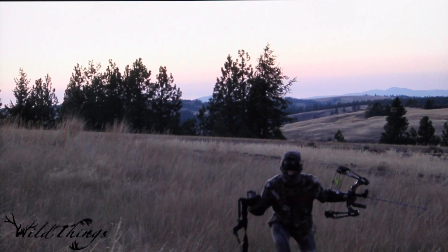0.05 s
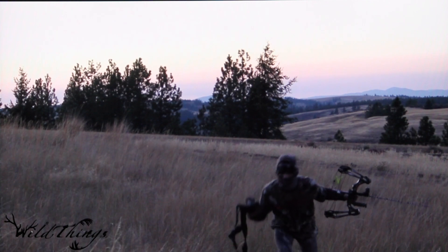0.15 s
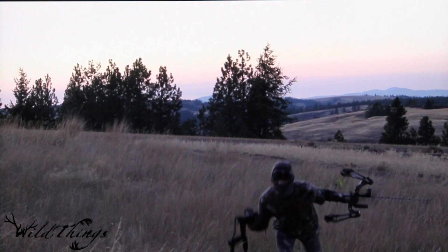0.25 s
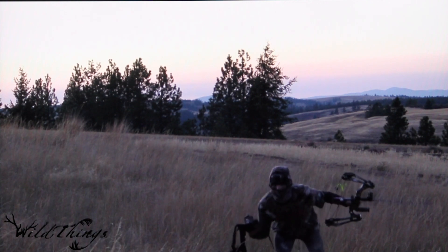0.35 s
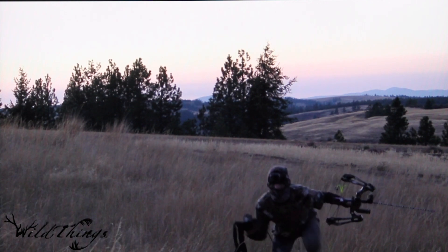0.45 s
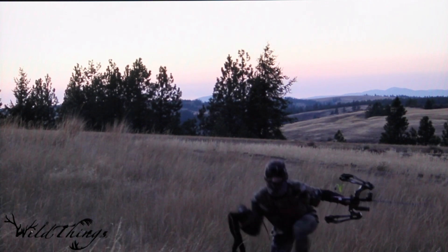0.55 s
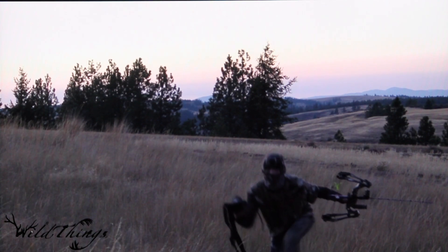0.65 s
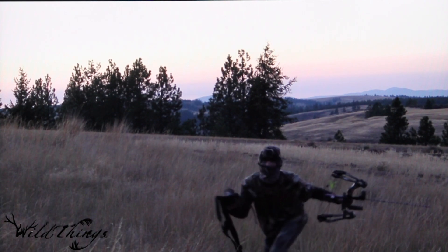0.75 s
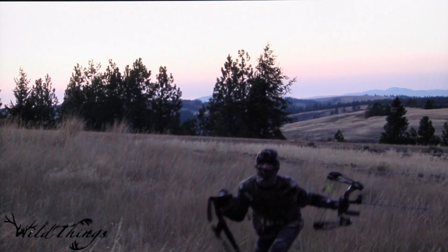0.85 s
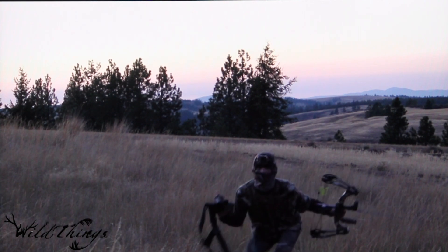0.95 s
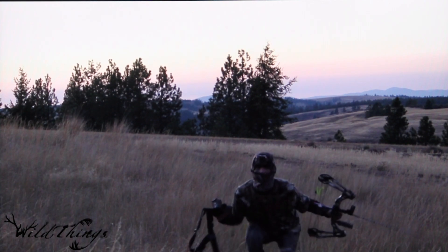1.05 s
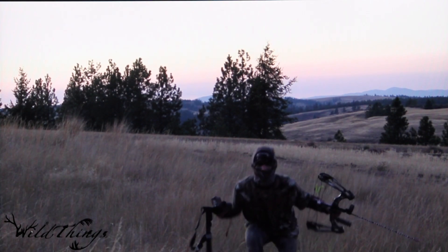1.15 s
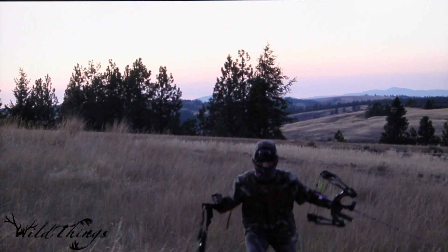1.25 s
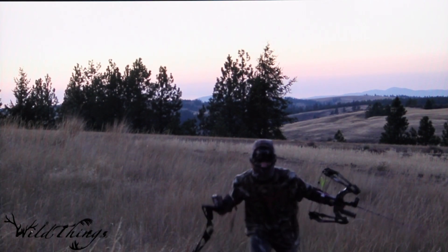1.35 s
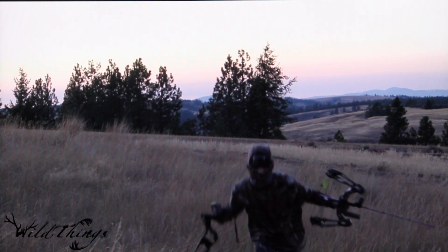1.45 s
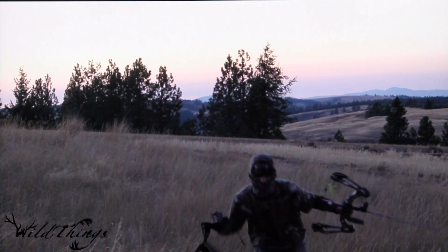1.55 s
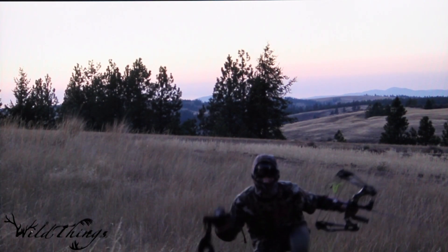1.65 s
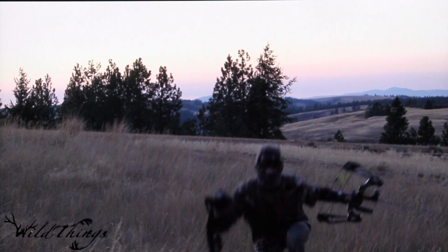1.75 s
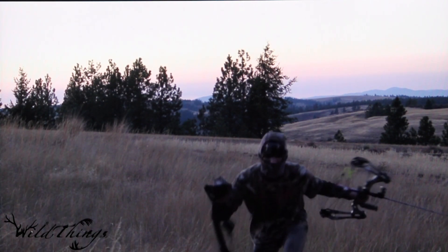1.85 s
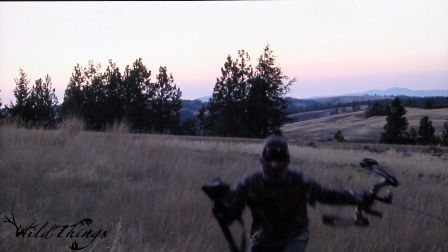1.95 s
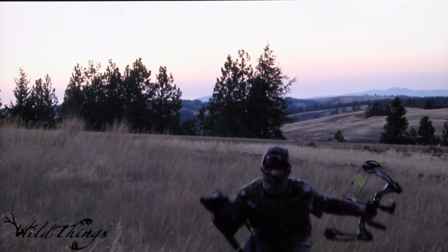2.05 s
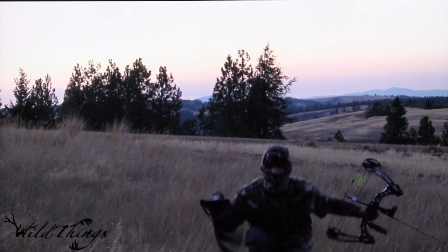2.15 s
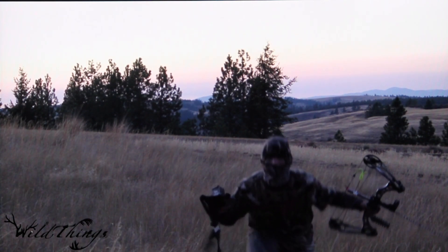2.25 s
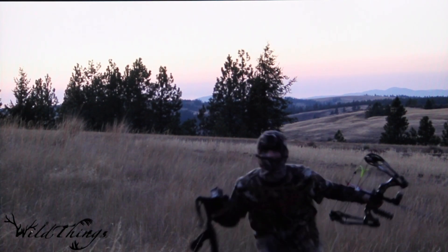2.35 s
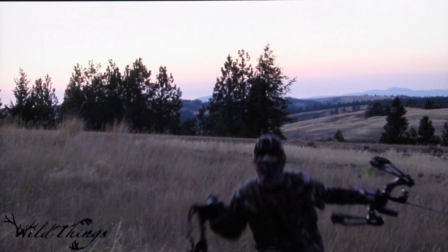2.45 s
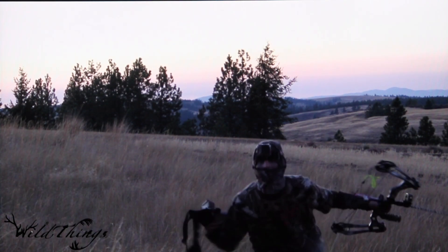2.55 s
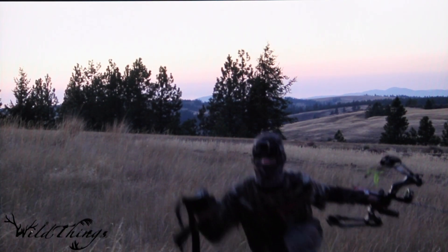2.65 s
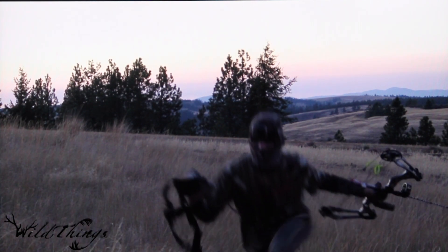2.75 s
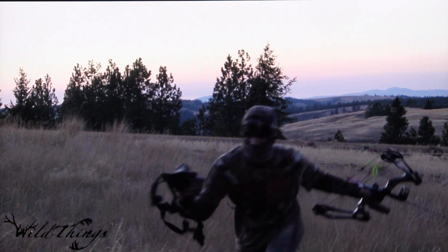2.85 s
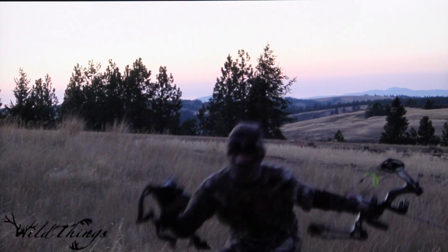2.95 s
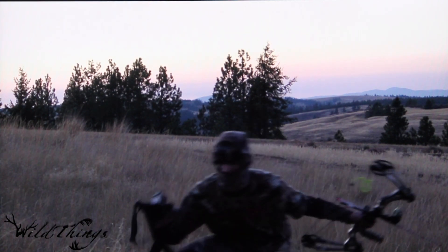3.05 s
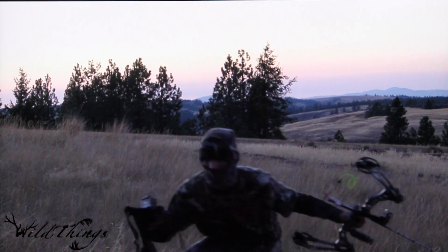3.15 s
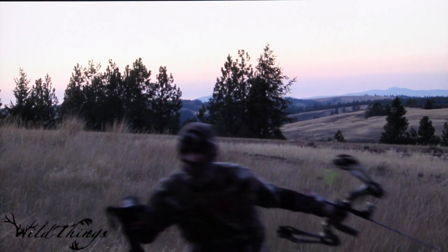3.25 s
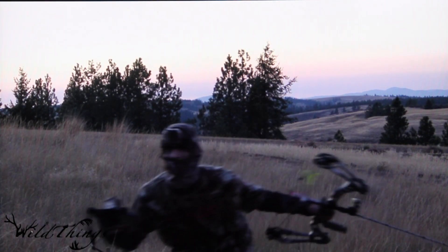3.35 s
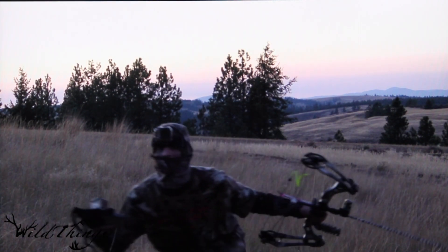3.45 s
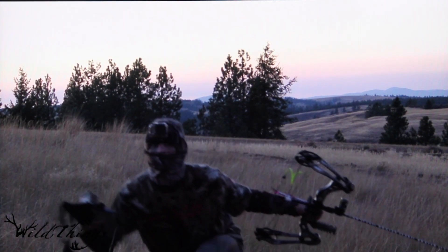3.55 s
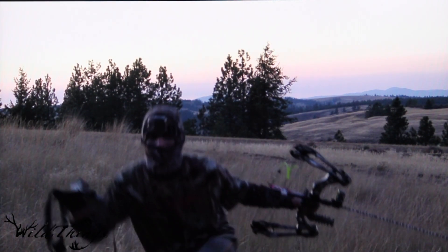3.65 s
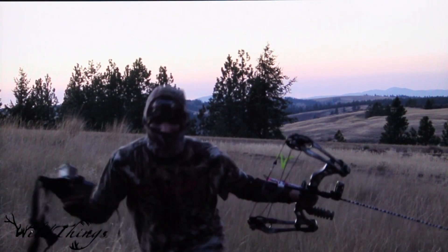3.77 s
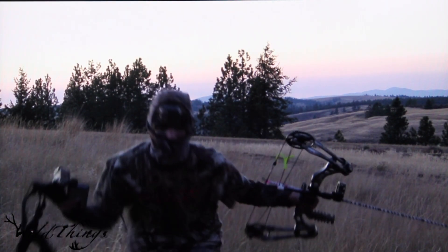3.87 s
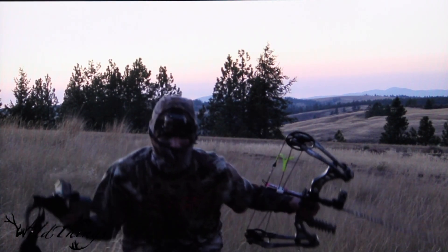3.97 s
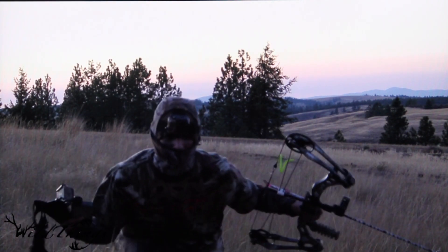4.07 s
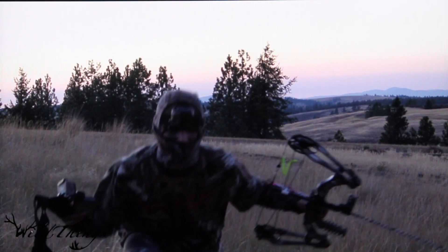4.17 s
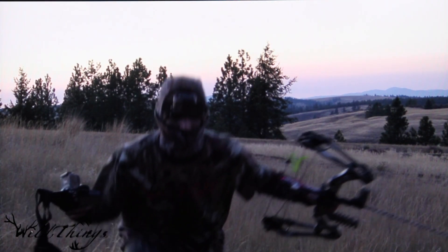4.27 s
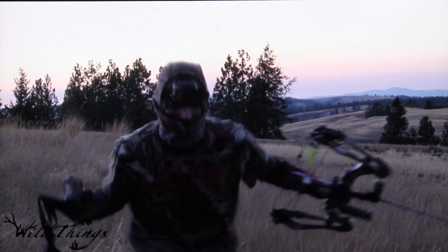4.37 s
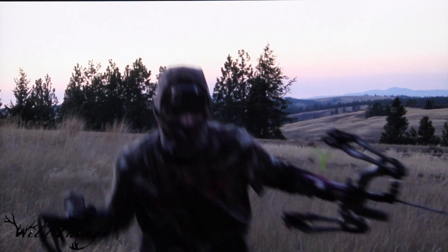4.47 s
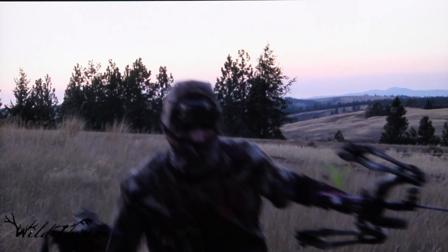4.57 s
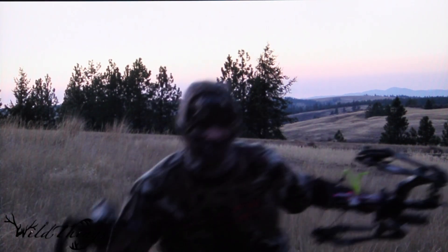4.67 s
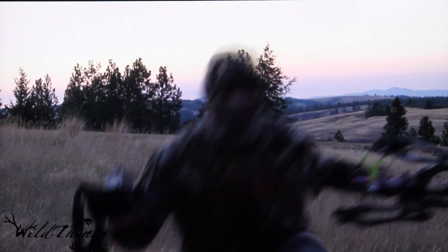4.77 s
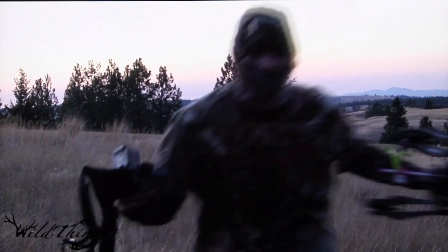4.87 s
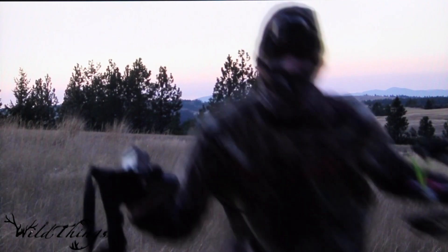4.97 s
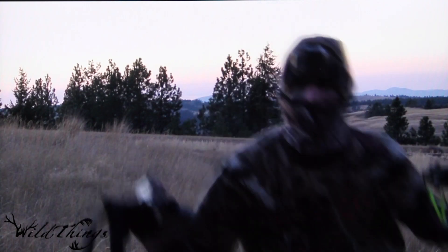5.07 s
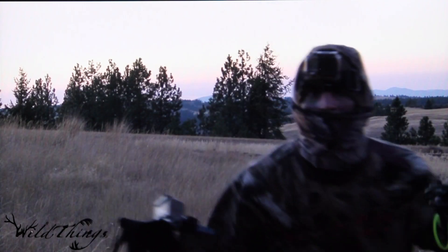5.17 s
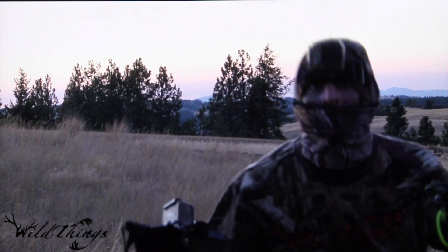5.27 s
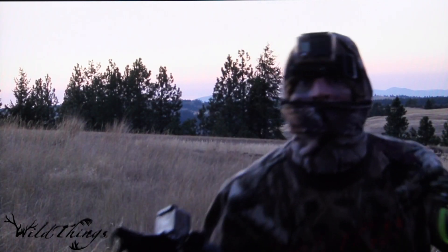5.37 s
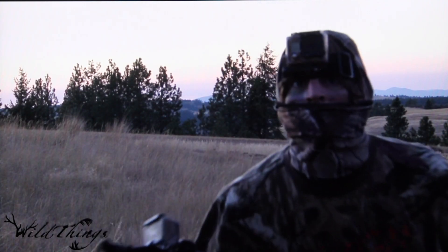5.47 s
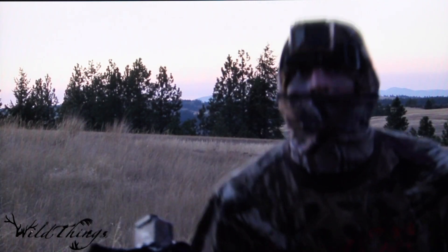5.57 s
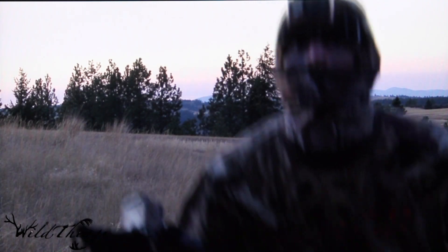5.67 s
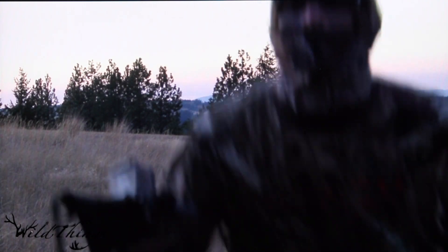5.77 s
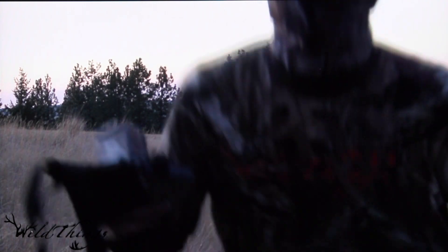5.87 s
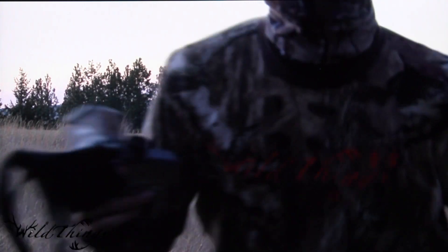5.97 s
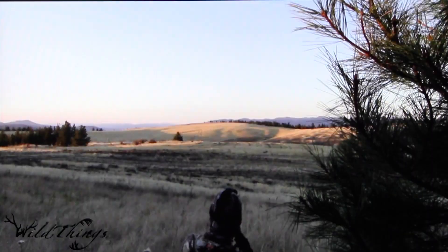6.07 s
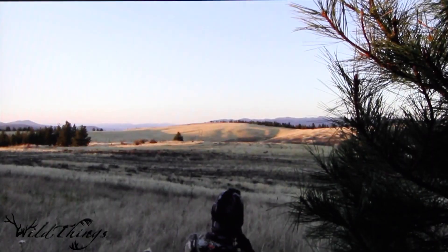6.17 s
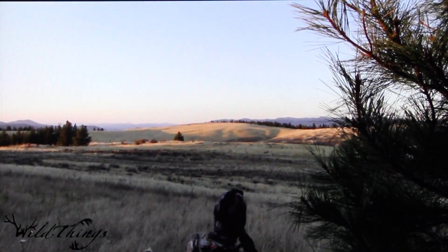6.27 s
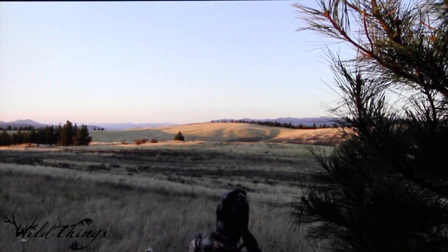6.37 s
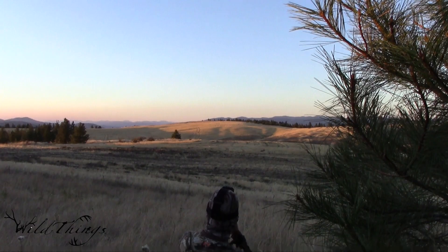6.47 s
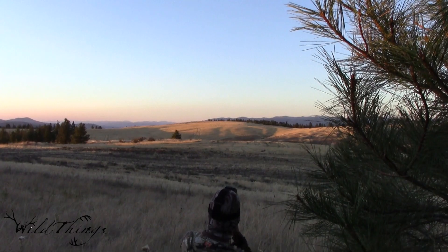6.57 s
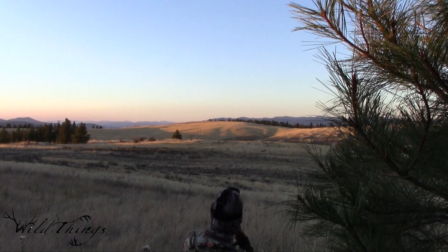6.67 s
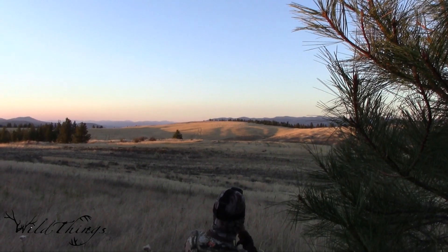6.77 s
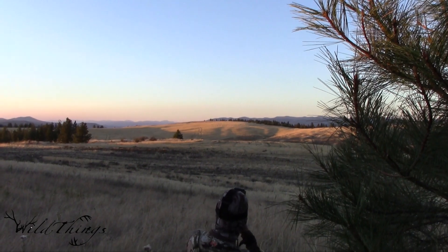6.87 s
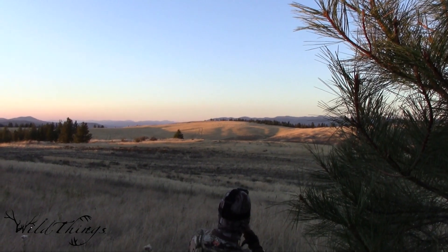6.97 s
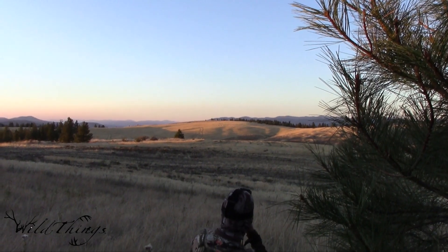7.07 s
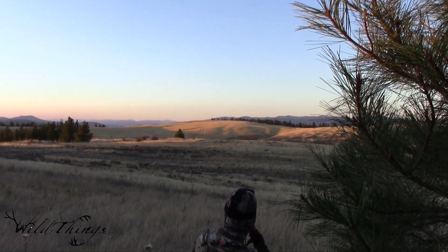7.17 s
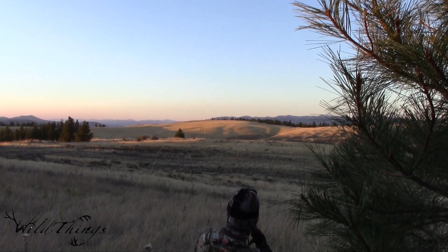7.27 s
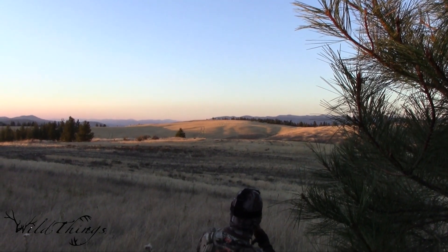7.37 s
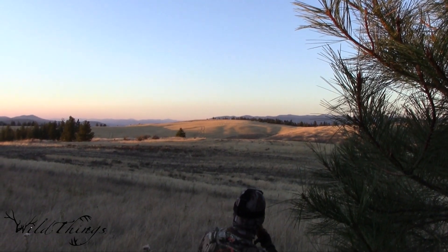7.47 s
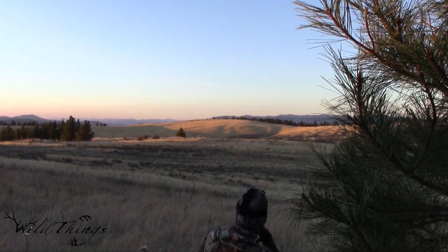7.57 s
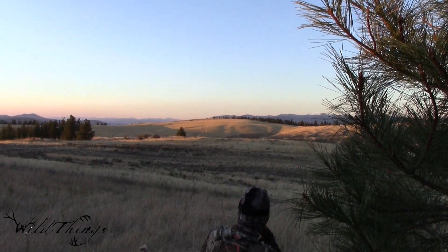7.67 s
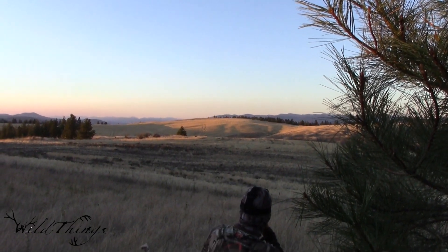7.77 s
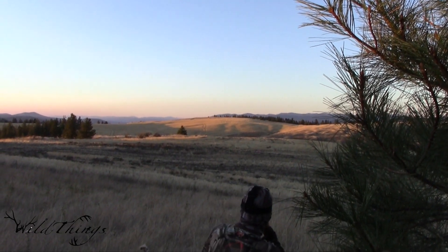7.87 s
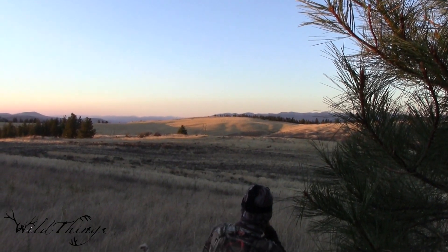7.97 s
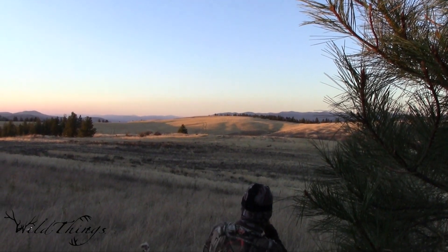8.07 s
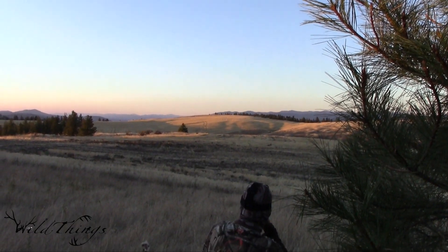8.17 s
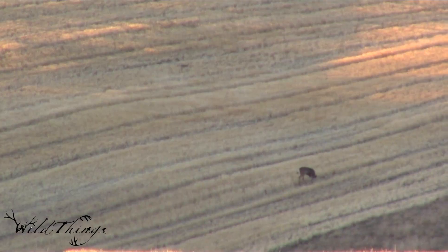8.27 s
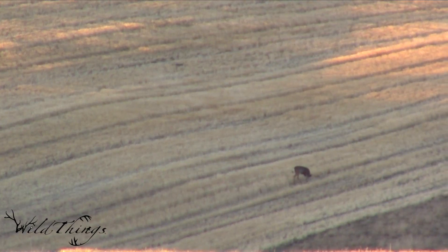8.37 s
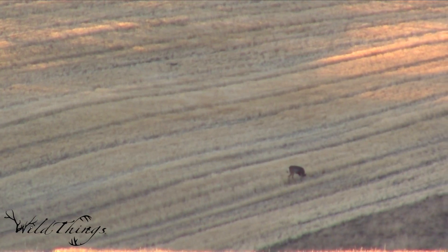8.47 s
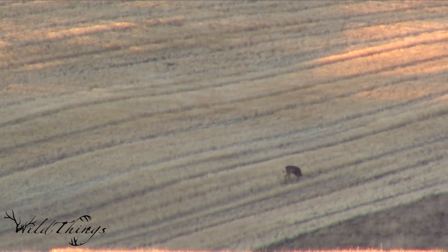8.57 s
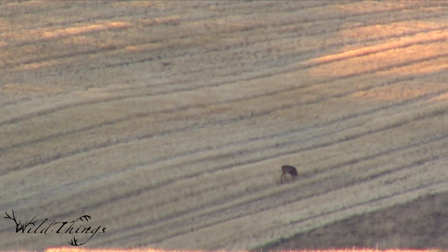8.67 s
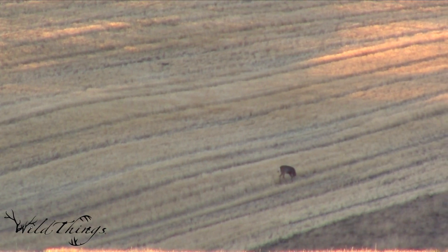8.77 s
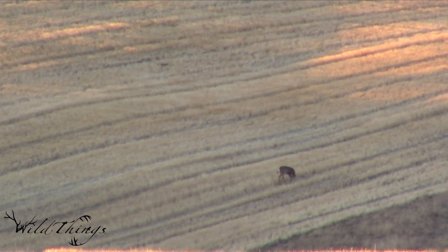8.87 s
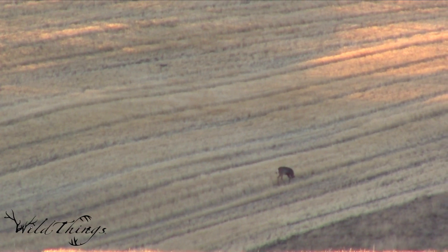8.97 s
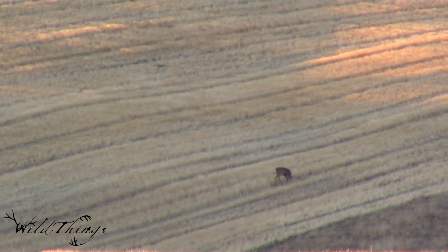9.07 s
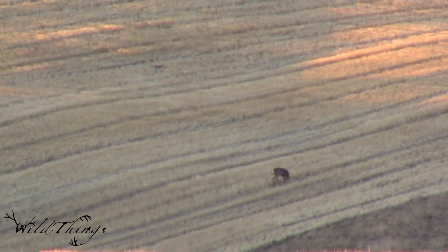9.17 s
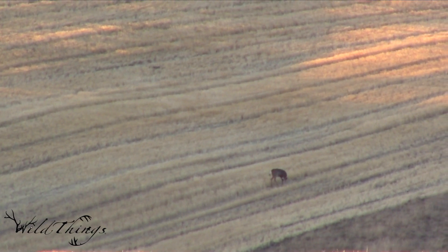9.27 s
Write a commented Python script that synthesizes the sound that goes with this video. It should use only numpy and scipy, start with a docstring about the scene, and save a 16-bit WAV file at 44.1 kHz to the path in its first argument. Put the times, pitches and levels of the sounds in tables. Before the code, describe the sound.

Dry, bright grass swishes, a few per second at first, then in longer sweeps, approach a nearly central microphone in the open, without reverberation. Muted footfalls and trouser rub lie underneath; brittle stalks snap and carried equipment ticks. Close by, several loud cracks and a resonant knock are heard. Suddenly the place becomes hushed, with soft air and a barely audible motor rasp, as a seated person shifts, jacket rustling close on both sides, and a soft bump comes late.

```python
"""A hunter wades through tall dry grass, at first farther off and then up to a camera on a field.
Random clicks and noise, filtered and enveloped, make swishing stalks, rubbing cloth and pressed litter;
decaying noise makes snapping stalks and knocking gear, and the camera case adds its resonances.
Then, abruptly, a quiet hillside: filtered noise for still air, a faint motor and a rustling jacket,
as someone sitting in the grass shifts a little; a few snaps and a soft bump still come."""
import sys
import numpy as np
from scipy import signal
from scipy.fft import rfft, irfft
from scipy.io import wavfile
from scipy.ndimage import uniform_filter1d

SR = 44100
rng = np.random.default_rng(int(sys.argv[2]) if len(sys.argv) > 2 else 0)


def generate_wav(sig):
    """Save sig (samples, or channels by samples) to the path in sys.argv[1] as 16-bit PCM at SR."""
    pcm = np.round(np.clip(np.atleast_2d(sig).T, -1, 1) * 32767).astype(np.int16)
    wavfile.write(sys.argv[1], SR, pcm)


N = 411276
TIME = np.arange(N) / SR
FREQS = np.fft.rfftfreq(8192, 1 / SR)
HILLSIDE_START_S = 6.516

# relative spectrum of sliding and breaking stalks: (frequency [Hz], density [dB per Hz])
GRASS_SPECTRUM = [(60, -66.5), (300, -52), (1000, -28.5), (2500, -15), (4000, -13.5), (5100, -11.5),
                  (5800, 2.5), (7000, -2.5), (8000, -3.5), (9400, -9), (10400, -2.5), (12300, -5),
                  (14800, -7.5), (15500, -28)]
# relative spectra of the air on the field and on the hillside: (frequency [Hz], density [dB per Hz])
FIELD_SPECTRUM = [(25, -21), (70, -2.5), (120, -8.5), (180, 0), (300, -2.5), (500, -8), (1000, -9),
                  (3000, -7.5), (14000, -25)]
HILL_SPECTRUM = [(25, -14.5), (70, -14), (130, -15.5), (270, -11.5), (380, -6.5), (600, -7.5), (770, -6.5),
                 (1250, -9), (1750, -7), (2100, -10), (6000, -17.5), (15000, -30)]


def undb(db):
    """Amplitude gain as the antilogarithm of a level in decibels."""
    return 10 ** (np.asarray(db) / 20)


def unit(x):
    """Normalisation to an rms of 1."""
    return x / np.sqrt(np.mean(x ** 2))


def loudest(x, span_s):
    """Normalisation of a short sound by the greatest short-time rms within it."""
    power = uniform_filter1d(x ** 2, int(span_s * SR), mode="constant")
    return x / np.sqrt(power.max())


def walk(rate):
    """Low-pass noise: random steps, rate per second, smoothed by a moving average to rms near 1."""
    k = int(SR / rate)
    steps = np.repeat(rng.standard_normal(N // k + 1), k)
    return unit(uniform_filter1d(steps, k))[:N]


def colour(x, points, ring_db=0):
    """Minimum-phase filter: folding the cepstrum makes a causal response from a magnitude alone."""
    hz, db = np.transpose(points)
    broad_db = np.interp(np.log(FREQS + 1), np.log(hz), db)
    cepstrum = irfft(np.log(undb(broad_db + ring_db)))
    half = len(FREQS) - 1
    cepstrum[1:half] *= 2
    cepstrum[half + 1:] = 0
    response = irfft(np.exp(rfft(cepstrum)))[:half]
    return signal.fftconvolve(x, response)[:len(x)]


def bump(hz, width):
    """Lorentzian resonance curve, 1 at its centre and one half at the edges of its width."""
    return 1 / (1 + (2 * (FREQS - hz) / width) ** 2)


def resonate(x, hz, width_hz):
    """Band-pass selection around one resonance."""
    edges = [hz - width_hz / 2, hz + width_hz / 2]
    return signal.sosfilt(signal.butter(2, edges, "band", fs=SR, output="sos"), x)


def crackle(rate, spread_db):
    """Shot noise: clicks at random moments, rate per second, most weak and a few strong."""
    size = undb(spread_db * np.minimum(rng.exponential(size=N), 5))
    return unit((rng.random(N) < rate / SR) * rng.choice([-1, 1], N) * size)


def swell(s, rise, fall, shape=1):
    """Exponential envelope reaching 1 at time s, with time constants in s; a higher shape rounds its top."""
    distance = np.maximum((s - TIME) / rise, (TIME - s) / fall)
    return np.exp(-np.minimum(distance, 30) ** shape)


def together(envelopes):
    """Incoherent superposition: the powers of unrelated rustles add."""
    return np.sqrt(sum(e ** 2 for e in envelopes))


def add(out, s, sound):
    """Linear superposition of a short sound starting at time s."""
    i = max(int(s * SR), 0)
    out[i:i + len(sound)] += sound[:N - i]


def case_ring(thicket_db=3.7, ring_s=.008, full_hz=3500):
    """Modal response in dB: the case's main resonances among random peaks that thin out toward the bass."""
    # resonances of the camera case: (centre [Hz], width [Hz], lift [dB])
    modes = [(550, 50, 8.5), (878, 60, 5.5), (1060, 130, 9.5), (1500, 90, 2.5), (1718, 110, 3),
             (2085, 90, 4), (2930, 240, 4.5), (3504, 78, 10), (4220, 60, 5.5), (4320, 70, 1.5),
             (6126, 110, -1), (6260, 50, 0.5), (7000, 470, 7), (7750, 110, 0.5), (8550, 50, 2.5),
             (8470, 120, 10), (9650, 70, 10), (11200, 60, 4)]
    t = TIME[:2 * len(FREQS) - 2]
    # a short noise burst has a spectrum of many narrow peaks and notches
    burst = rng.standard_normal(len(t)) * t * np.exp(-2 * t / ring_s)
    thicket = unit(rfft(burst).real)
    depth_db = thicket_db * np.minimum(FREQS / full_hz, 1)
    main_db = sum(db * bump(hz, width) for hz, width, db in modes)
    return main_db + depth_db * 2 * np.tanh(thicket / 2)


def gait():
    """Inverse-distance law: envelopes of grass, clothing and boots, each proportional to 1 / distance."""
    # the walker's distance from the camera: (time [s], distance [m])
    path = [(0, 4.9), (1.2, 12.2), (3.1, 5.84), (4.2, 2.43), (5.1, 1.16), (5.9, 1.2), (6.5, 0.78)]
    # a leg sweeps through the grass: (time of the fastest moment [s], grass level at 1 m [dB],
    # rise constant [s], fall constant [s], trouser rub relative to grass [dB])
    swishes = [(.125, -33, 0.012, .03, -16), (.24, -31, 0.014, 0.17, -20), (.57, -28.5, 0.089, 0.074, -12),
               (.755, -22.5, 0.019, 0.11, -7), (.89, -30, .04, 0.19, -2.5), (1.395, -17, 0.048, 0.096, -10),
               (1.755, -17.5, 0.057, 0.18, -16.5), (1.87, -22.5, 0.059, 0.44, -13),
               (2.14, -30, 0.023, 0.051, -16.5), (2.384, -14, 0.077, 0.15, -16),
               (2.823, -14, 0.13, 0.11, -16), (3.21, -26.5, .02, 0.044, -23),
               (3.29, -22.5, 0.078, .12, -20), (3.599, -20, 0.051, 0.11, -19),
               (3.786, -21.5, 0.1, .055, -16), (3.972, -29, 0.041, 0.04, -26),
               (4.431, -22.5, 0.075, 0.051, -18), (4.56, -29, 0.12, .07, -13),
               (4.77, -26, 0.075, 0.11, -17.5), (4.89, -32.5, 0.042, 0.21, -37),
               (5.255, -28, 0.071, 0.056, -19), (5.345, -22, 0.048, 0.047, -10),
               (5.46, -35, .03, 0.045, -18), (5.57, -23.5, 0.14, 0.035, -23), (5.7, -18, 0.073, 0.088, -22),
               (5.871, -19.5, 0.077, 0.078, -11), (6.07, -26, 0.24, 0.18, -11),
               (6.326, -32.5, 0.048, 0.011, -17.5)]
    # a boot presses the matted grass down: (time of full weight [s], level at 1 m [dB])
    footfalls = [(.25, -49), (.81, -39), (1.4, -42), (2.395, -43), (2.88, -49), (3.31, -48), (3.795, -51),
                 (4.22, -64), (4.39, -51), (5.345, -47.5), (5.885, -46.5), (6.18, -55)]
    brush_db, rub_floor_db, scrape_db = -36, -45.5, -61.5  # grass, cloth, litter between moves, at 1 m
    halt_s, halt_fall_s, halt_db = 6.34, 0.008, -14.5  # the legs come to rest and the brushing drops
    press_s, lift_s = .05, .05  # weight comes on and off
    swish_shape = 1.44  # 1 is a pointed swell, 2 a rounded one

    near = 1 / np.interp(TIME, *np.transpose(path))
    halted = 1 - np.exp(-np.maximum(TIME - halt_s, 0) / halt_fall_s)
    stalks = [undb(brush_db + halt_db * halted)]
    cloth = [undb(rub_floor_db)]
    for s, db, rise, fall, rub_db in swishes:
        sweep = undb(db) * swell(s, rise, fall, swish_shape)
        stalks.append(sweep)
        cloth.append(sweep * undb(rub_db))
    boots = [undb(scrape_db)]
    boots += [undb(db) * swell(s, press_s, lift_s) for s, db in footfalls]
    return near * together(stalks), near * together(cloth), near * together(boots)


def grass(ring, sweep, flick_limit=3.5):
    """Stick-slip friction: stalks flick past each other in bunches, over the hiss of sliding blades."""
    flicks = crackle(rate=4000, spread_db=0.5) * undb(2.3 * walk(rate=130))
    # a soft limit keeps any single random flick from standing out of the rustle
    flicks = 2 * flick_limit * np.tanh(flicks / (2 * flick_limit))
    blades = undb(0.5) * rng.standard_normal(N)
    bunches = undb(1.1 * walk(rate=110))
    tufts = undb(1.0 * walk(rate=25))
    rustle = (flicks + blades) * bunches * tufts
    return unit(colour(rustle, GRASS_SPECTRUM, ring)) * sweep


def body(ring, rub, tread):
    """Granular friction and crushing: clothing rubs in fine grains, boots crush the litter underneath."""
    # relative spectra of clothing and of boot on litter: (frequency [Hz], density [dB per Hz])
    fabric = [(60, -49), (300, -26), (650, -10), (830, -4.5), (1050, -5), (1300, -6), (1950, 2.5),
              (2600, -5), (3500, -3.5), (4800, -9), (7000, -8.5), (14000, -30.5)]
    sole = [(40, -22), (120, -13.5), (220, 5), (330, 5.5), (450, -0.5), (700, 3.5), (1200, -4.5),
            (2500, -32)]
    grains = crackle(rate=5000, spread_db=2.5) * undb(2.17 * walk(rate=45))
    cloth = unit(colour(grains, fabric, ring))
    boots = unit(colour(crackle(rate=1000, spread_db=4.5), sole, ring))
    return cloth * rub + boots * tread


def drone(hz=168, width_hz=30, start_db=-63, fade_db_per_s=11.5):
    """Narrow-band noise: a far, low hum wavers at random and dies away exponentially."""
    hum = unit(resonate(rng.standard_normal(N), hz, width_hz))
    return hum * undb(start_db - fade_db_per_s * TIME)


def air(points, db, side_db, waver_db=.5):
    """Partly correlated noise: a faint open-air hush, a little unsteady, built from mid and side signals."""
    mid, side = (unit(colour(rng.standard_normal(N), points)) * undb(waver_db * walk(rate=8.2))
                 for _ in range(2))
    return undb(db) * (mid + undb(side_db) * side * np.array([[1], [-1]]))


def creases(width=.25):
    """Frictional excitation of a resonance: stiff cloth drags over itself and sounds in one narrow band."""
    # creases of the jacket: (time of the loudest moment [s], level [dB], pitch [Hz], time constant [s])
    folds = [(.035, -52, 2750, 0.034), (6.05, -42, 1950, 0.026), (6.184, -32, 1950, 0.017),
             (6.326, -46.5, 1900, 0.13), (6.502, -39.5, 1900, 0.0076), (7.865, -60.5, 2400, 0.031),
             (8.03, -64, 1390, .04), (8.2, -61.5, 1390, 0.035), (8.288, -58.5, 1790, .025)]
    weave = crackle(rate=6600, spread_db=4.0) * undb(1.3 * walk(rate=27))
    out = np.zeros(N)
    for s, db, hz, length in folds:
        band = unit(resonate(weave, hz, hz * width))
        out += band * undb(db) * swell(s, length, length, 2.6)
    return out


def snaps(ring, crack_s=0.00091, gap_s=0.0057, splinter_db=-8):
    """Brittle fracture: a hollow stalk breaks with two cracks, one for each wall, then splinters."""
    # stalks that snap: (time [s], level [dB], time for splintering to fall 40 dB [s], woody body lift [dB])
    breaks = [(0.7207, -42, .02, 2), (0.74, -35.5, .05, 5), (0.7974, -34, .04, 14), (2.823, -29, .08, -8),
              (3.587, -30, .1, -2), (3.6348, -26.5, .02, -3), (3.964, -46, .12, 0), (4.097, -34, .08, -20),
              (4.97, -30.5, .05, 2), (5.635, -30, .03, -4), (5.653, -17, .1, -11.5),
              (5.668, -15, .16, -6.5), (5.703, -20.5, .14, -7.5), (5.723, -19.5, .06, -8),
              (5.83, -20, .08, -7), (7.507, -54.5, .02, 16), (7.529, -49, 0.091, 4),
              (7.888, -52.5, 0.018, 14)]
    out, t = np.zeros(N), TIME[:SR // 5]
    first = np.exp(-t / crack_s)
    second = (t > gap_s) * np.exp(-np.abs(t - gap_s) / crack_s)
    for s, db, length, wood_db in breaks:
        splinter = undb(splinter_db - 40 * t / length)
        fibres = rng.standard_normal(len(t)) * (first + second + splinter)
        snap = colour(fibres, GRASS_SPECTRUM, ring + wood_db * bump(2400, 5000))
        add(out, s, loudest(snap, .006) * undb(db))
    return out


def blow(ring, hz, t60, clack_db, spread=0.15):
    """Impact excitation: a contact chatters for milliseconds while a cluster of close modes rings on."""
    # relative spectrum of the chattering contact: (frequency [Hz], density [dB per Hz])
    contact_spectrum = [(60, -50.5), (300, -29.5), (900, -18), (1500, 2.5), (2000, 2), (4300, 3),
                        (5000, -5), (5600, 4), (8000, -11.5), (14000, -33)]
    t = TIME[:SR // 3]
    chatter, modes = rng.standard_normal((2, len(t)))
    contact = np.exp(-t / .007) - .7 * np.exp(-t / .002)  # builds, then dies
    clack = colour(chatter * contact, contact_spectrum, ring)
    width_hz = spread * min(hz, 2500) + 90
    rung = resonate(modes, hz, width_hz) * undb(-60 * t / t60)
    return undb(clack_db) * loudest(clack, .012) + loudest(rung, .012)


def gear(ring):
    """Damped modal ringing: carried gear clacks and rings briefly, low modes giving soft bumps."""
    # knocks and bumps: (time [s], ring level [dB], ring frequency [Hz], ring decay T60 [s],
    # clack relative to ring [dB])
    knocks = [(1.074, -52, 1930, 0.081, -4), (2.115, -52, 1860, 0.074, -6), (2.543, -50, 3930, 0.082, -1),
              (3.038, -44.5, 1033, 0.12, -0.5), (3.303, -36.5, 4040, 0.15, -4),
              (3.986, -54, 1730, 0.051, 4.5), (4.493, -41, 4090, 0.12, -18), (4.979, -49.5, 220, 0.09, 3),
              (5.209, -45, 1440, 0.13, 3), (5.805, -45, 574, 0.14, 4), (6.098, -54.5, 241, 0.13, -14),
              (6.185, -21, 2086, 0.17, 2.5), (8.645, -60, 384, 0.1, -25)]
    out = np.zeros(N)
    for s, db, hz, t60, clack_db in knocks:
        add(out, s, undb(db) * blow(ring, hz, t60, clack_db))
    return out


def whirr(hz=1720, width_hz=190, turn_hz=26.6, db=-73):
    """Periodic amplitude modulation: a small camera motor rasps faintly once each turn."""
    rasp = np.exp(1.5 * np.cos(2 * np.pi * turn_hz * TIME))
    return unit(resonate(rng.standard_normal(N), hz, width_hz) * rasp) * undb(db)


def jacket(ring, motion, ear, rustle_db=-61):
    """Near-field friction: cloth beside the microphones gives each ear (toward 1 left, -1 right) own grains."""
    # sleeve scuffs: (time of the loudest moment [s], level [dB], rise constant [s], fall constant [s],
    # left minus right for ears at 1 and -1 [dB], brightest frequency [Hz])
    scuffs = [(6.702, -27, 0.0053, 0.004, 1, 2280), (7.212, -43, 0.023, 0.008, -1, 3190)]
    # relative spectra of jacket and sleeve: (frequency [Hz], density [dB per Hz])
    jacket_spectrum = [(60, -38), (200, -20), (450, -1.5), (900, -4), (1500, -3), (3000, -4.5), (5000, -14),
                       (12000, -30)]
    sleeve_spectrum = [(150, -24), (1100, -17.5), (1520, -2), (1800, -1), (2270, -2), (3000, -8.5),
                       (4200, -7), (5100, -14), (5550, -9), (6100, -16), (8000, -22), (14000, -35)]
    weave = crackle(rate=3300, spread_db=4.0) * undb(1.0 * walk(rate=28))
    out = unit(colour(weave, jacket_spectrum)) * motion * undb(rustle_db)
    for s, db, rise, fall, pan_db, hz in scuffs:
        # the case rings less here
        peaks_db = 0.51 * ring + 7 * bump(hz, 0.13 * hz)
        sleeve = unit(colour(weave, sleeve_spectrum, peaks_db))
        out = out + sleeve * swell(s, rise, fall, shape=0.99) * undb(db + ear * pan_db / 2)
    return out


def sitter(ring):
    """Motion-modulated friction: the jacket rustles on both sides and a few stalks stir in the centre."""
    # stalks flicking free: (time of the loudest moment [s], level before filter and final gain [dB])
    flick_times = [(7.303, -63), (7.435, -54), (7.45, -60), (7.648, -55), (7.703, -62), (7.745, -61),
                   (7.815, -59), (7.957, -53), (8.003, -57), (8.202, -59)]
    # spectrum of the stalks beside the sitter: (frequency [Hz], filter gain before the final gain [dB])
    stalk_spectrum = [(1000, -30.5), (4500, -6.5), (6000, 0), (7500, 1.5), (10000, -7), (15000, -14)]
    # the sitter shifts once: the jacket swells, holds and stops
    start_s, end_s, attack_s, release_s = 7.69, 8.3, 0.4, 0.034
    flick_rise_s, flick_fall_s = 0.0037, .018

    early = np.maximum(start_s - TIME, 0)
    late = np.maximum(TIME - end_s, 0)
    motion = np.exp(-early / attack_s - late / release_s)
    flicks = [undb(db) * swell(s, flick_rise_s, flick_fall_s) for s, db in flick_times]
    stirring = crackle(rate=500, spread_db=0.5) * undb(-67.5) * motion
    flicking = crackle(rate=3200, spread_db=2.0) * together(flicks)
    stalks = undb(7.0) * colour(stirring + flicking, stalk_spectrum)
    return np.array([jacket(ring, motion, 0.96), jacket(ring, motion, -0.9)]) + stalks


def scene():
    """Superposition of sources: a nearly central approach, then abruptly a wide hillside."""
    ring = case_ring()
    sweep, rub, tread = gait()
    approach = grass(ring, sweep) + body(ring, rub, tread) + drone()
    approach = approach + air(FIELD_SPECTRUM, -59.5, side_db=-40.0)
    hillside = sitter(ring) + whirr() + air(HILL_SPECTRUM, -64.5, side_db=1.5)
    places = np.where(TIME < HILLSIDE_START_S, approach, hillside)
    return places + snaps(ring) + gear(ring) + creases()


def record(dry, top_hz=15400):
    """Band limitation: a steep elliptic low-pass removes the very top."""
    return signal.sosfilt(signal.ellip(10, .2, 80, top_hz, fs=SR, output="sos"), dry)


dry = scene()
out = record(dry)
generate_wav(out)
```